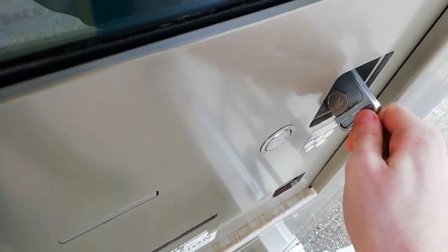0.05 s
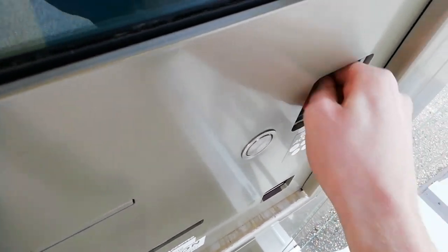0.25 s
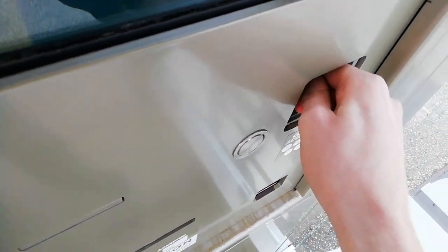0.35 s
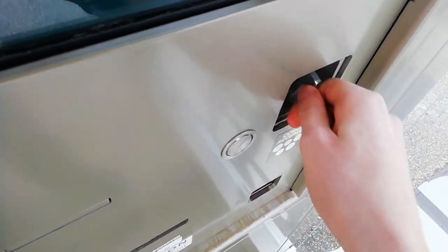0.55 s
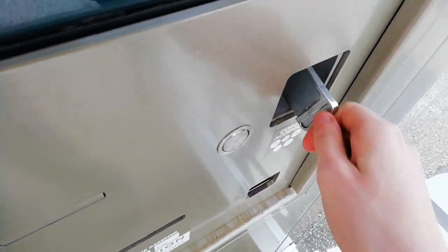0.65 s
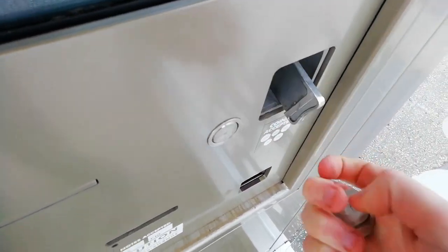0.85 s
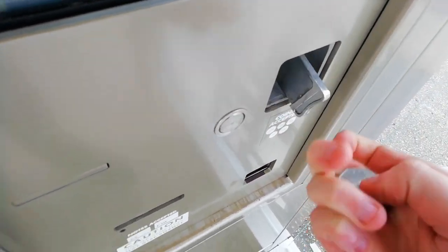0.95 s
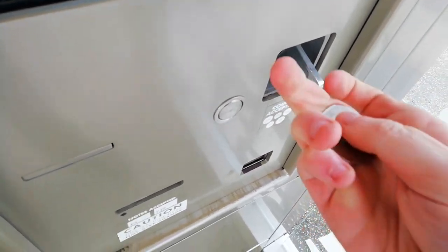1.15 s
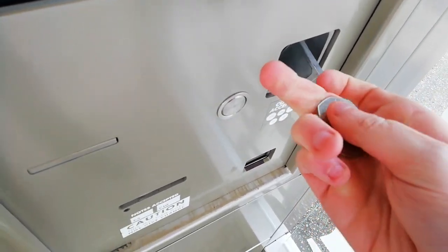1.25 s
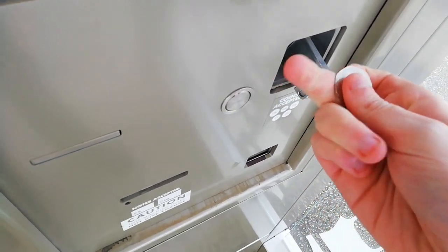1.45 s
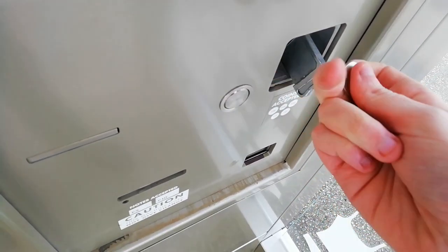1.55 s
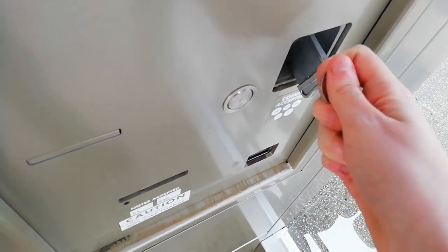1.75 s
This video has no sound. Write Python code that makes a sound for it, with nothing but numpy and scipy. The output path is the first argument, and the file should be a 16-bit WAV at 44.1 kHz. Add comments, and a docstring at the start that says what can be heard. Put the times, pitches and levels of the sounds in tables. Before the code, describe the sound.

A steel coin slide on a laundry machine is pushed in and springs back with sharp clanks and scrapes. The coin skitters down a chute, then coins click in a hand. It is close, with machines humming in the room.

```python
"""Laundry machine coin slide

A steel coin slide is pushed home and springs back, scraping in its guide and clanking against
the cabinet. The coin drops and skitters ringing down its chute; the next coins click in the hand.
The slot is close and louder on the left. Machines hum and rumble in the room."""
import sys
import numpy as np
from scipy.fft import rfft, irfft, next_fast_len
from scipy.io import wavfile
from scipy.ndimage import map_coordinates

SR = 44100
rng = np.random.default_rng(int(sys.argv[2]) if len(sys.argv) > 2 else 0)


def master(y):
    """Save y as 16-bit WAV."""
    cut = np.clip(np.atleast_2d(y).T, -1, 1)
    pcm = np.round(cut * 32767)  # scale
    wavfile.write(sys.argv[1], SR, pcm.astype(np.int16))


N = 79380
T = np.arange(N) / SR
ATTACK_S, TOP_HZ = 0.00011, 15900

# Blows of slide and coin (time [s], body [dB], clank [dB], edge [dB], sparkle [dB])
BLOWS = [(0.188, -37, -41, -43, -36.5), (0.2017, -34, -35, -33.5, -33), (0.2184, -29, -16, -25.5, -26),
         (0.2248, -31, -11, -14, -21), (0.2394, -24.5, -32, -44, -35), (0.2694, -32, -10.5, -21, -32.5),
         (0.2769, -23.5, -21.5, -35, -35), (0.3103, -15.5, -8, -16, -22), (0.3597, -37, -39, -30, -35),
         (0.396, -42, -25, -29.5, -21), (0.5104, -37, -36.5, -47, -45), (0.5521, -34, -30, -37, -35.5),
         (0.5855, -33, -24, -31, -41), (0.5922, -27, -22, -15, -30), (0.6015, -23.5, -24, -23, -21.5),
         (0.6077, -22, -18, -23.5, -19.5), (0.6833, -27.5, -24, -22.5, -15.5),
         (0.7175, -14.5, -13.5, -18, -14), (0.8142, -27, -21.5, -22.5, -18), (1.0045, -44, -52, -41.5, -34)]
# Steelwork decay, body to sparkle band (level [dB], t60 [s], late level [dB], late t60 [s])
BAND_DECAYS = [(-2, 0.079, -9.5, 0.24), (-2, 0.057, -17.5, 0.34), (0, 0.052, -14, 0.25),
               (0, 0.051, -24, 0.47)]
# Slide and front panel modes (frequency [Hz], level [dB], t60 [s])
PANEL_MODES = [(1066, -7.5, 0.22), (1373, -2.5, 0.17), (1682, -2, 0.093), (2146, -10, 0.13),
               (2238, 1.5, 0.094), (2353, -5.5, 0.08), (2850, -5.5, 0.11), (3300, -15, .13),
               (3525, -14, 0.1), (3497, -4, 0.06), (4540, -8, 0.072), (6470, -17, .15), (10130, -9, 0.099),
               (14770, -14, 0.089)]
CABINET_HZ, CABINET_DB, CABINET_T60_S = 265, -17, 0.35
MODES_DB, CRACK_DB, CRACK_T60_S = -7, 2, 0.0073
BAND_EDGES_HZ = [480, 2000, 4500, 9000, 17000]


def slide():
    """Each blow: a crack, a fast-dying clatter, and ringing panel and cabinet modes."""
    out, t = np.zeros((2, N)), T[:next_fast_len(SR // 4)]
    centres_hz = np.sqrt(np.multiply(BAND_EDGES_HZ[:-1], BAND_EDGES_HZ[1:]))
    modes = [(CABINET_HZ, CABINET_DB, CABINET_T60_S), *PANEL_MODES]
    waves, mode_hz = tones(modes, t), [mode[0] for mode in modes]
    crack = amp(CRACK_DB) * decay(t, CRACK_T60_S)
    envelopes = []
    for db, t60, late_db, late_t60 in BAND_DECAYS:
        late_ring = amp(late_db) * decay(t, late_t60)
        envelopes.append(amp(db) * np.sqrt(crack ** 2 + decay(t, t60) ** 2 + late_ring ** 2))
    for start_s, *band_db in BLOWS:
        drive_db = np.interp(mode_hz, centres_hz, band_db)
        add(out, start_s, strike(waves, drive_db + MODES_DB, scatter_db=2.5))
        for db, band, envelope in zip(band_db, clatter(len(t)), envelopes):
            add(out, start_s, amp(db) * band * envelope)
    return out


# Struck steel spectrum (frequency [Hz], level [dB])
STEEL_SPECTRUM = [(400, -27), (600, -14), (800, -22), (930, -2), (1400, -6.5), (1700, -2), (1880, -6),
                  (2200, -1), (2750, -7.5), (3400, -1.5), (3900, -10.5), (4800, -8), (5800, -8.5),
                  (7400, -11.5), (8800, -18), (10100, -2), (11000, -10.5), (13000, -5.5), (14900, -4),
                  (15900, -21)]
CONTACT_SCATTER_DB, CONTACT_STEP_HZ = 3, 150


def clatter(n):
    """Dense steel resonances, rms 1 per band; each contact point favours different ones."""
    hz = np.fft.rfftfreq(n, 1 / SR)
    knots = rng.standard_normal(512)
    contact_db = CONTACT_SCATTER_DB * np.interp(hz / CONTACT_STEP_HZ, np.arange(len(knots)), knots)
    spectrum = rfft(rng.standard_normal((2, n))) * amp(along(STEEL_SPECTRUM, hz) + contact_db)
    bands = [(hz > lo) & (hz <= hi) for lo, hi in zip(BAND_EDGES_HZ, BAND_EDGES_HZ[1:])]
    return [unit(irfft(spectrum * band, n)) for band in bands]


# Slide strokes (time [s], length [s], level [dB])
STROKES = [(0.406, 0.049, -29), (0.441, 0.076, -40.5), (0.52, 0.029, -34.5), (0.544, 0.04, -41),
           (0.634, 0.06, -28.5), (0.715, 0.006, -16), (0.75, 0.061, -47.5)]
# Steel-on-steel friction spectrum (frequency [Hz], level [dB])
SCRAPE_SPECTRUM = [(900, -20), (1400, 2), (2300, -3.5), (3200, 2), (4200, -6.5), (7000, -10), (9000, -16),
                   (11000, -14.5), (15000, -14)]


def scrapes():
    """The slide rubs in its guide in short, gritty strokes."""
    envelope = sum(amp(db) * np.sin(np.pi * np.clip((T - start_s) / length_s, 0, 1))
                   for start_s, length_s, db in STROKES)
    grit = unit(amp(wobble(600)))
    return envelope * grit * noise(SCRAPE_SPECTRUM, 1200, 15000, coherence=0.054)


# Skitter envelope (time [s], level [dB])
SKITTER_LEVEL = [(0.82, -23.5), (0.87, -30), (0.93, -31), (0.99, -39.5), (1.05, -43.5), (1.1, -51.5),
                 (1.3, -54.5)]
# Skitter spectrum (frequency [Hz], level [dB])
SKITTER_SPECTRUM = [(880, -42), (1500, 4), (1830, 0.5), (2720, -9.5), (3410, -4.5), (4000, -8.5),
                    (4870, -3.5), (9470, -14), (10600, -6.5), (12200, -8.5), (12600, -3.5), (13900, -9),
                    (15100, -2.5), (16000, -4.5)]
# Loose coin modes (frequency [Hz], level [dB], t60 [s])
LOOSE_COIN_MODES = [(3340, -12, 0.26), (4720, -18, .5), (12600, 2, 0.23), (12500, -2, .3), (12700, -5, .3),
                    (15170, -5, .25), (15350, 3, .25)]
# Hits on the loose coin (time [s], level [dB])
COIN_HITS = [(0.225, -46), (0.396, -41), (0.814, -28), (0.921, -32.5)]
SPIN_DB, SPIN_RATE_HZ = 0.5, 55


def chute():
    """The struck coin rings, flickering as it turns, and skitters down; the chute walls ring on."""
    gate = np.clip((T - 0.816) / 0.0055, 0, 1) * np.clip((1.45 - T) / 0.04, 0, 1)
    skitter = level(SKITTER_LEVEL) * noise(SKITTER_SPECTRUM, 1870, 22600, coherence=0.081)
    contacts = unit(amp(1.3 * wobble(60.3) + wobble(570)))
    out = gate * skitter * contacts
    ring, waves = np.zeros((2, N)), tones(LOOSE_COIN_MODES, T[:SR // 2])
    for start_s, db in COIN_HITS:
        add(ring, start_s, strike(waves, db, scatter_db=1.5))
    add(out, 0.814, cluster(hz=4791, db=-45.5, t60_s=2.2, rel_width=0.11))  # walls
    return out + ring * amp(SPIN_DB * wobble(SPIN_RATE_HZ))


# Coin contacts in the hand (time [s], level [dB])
HAND_CLINKS = [(0.0129, -31.5), (1.3248, -37.5), (1.359, -21.5), (1.3631, -25.5), (1.403, -39.5),
               (1.493, -40.5)]
# Finger-damped coin modes (frequency [Hz], level [dB], t60 [s])
HELD_COIN_MODES = [(3400, -12, 0.022), (4180, 7.5, 0.011), (4770, -6, 0.059), (5770, -5, 0.077),
                   (6140, 2.5, 0.011), (10020, -2.5, 0.025), (14100, -11, .03)]
# Contact tick spectrum (frequency [Hz], level [dB])
TICK_SPECTRUM = [(2000, -16), (3600, -5), (4700, 4.5), (6200, -3), (7800, -14.5), (9000, -31), (10200, -7),
                 (12000, -13.5), (15500, -8)]
CLINK_DB, TICK_DB, TICK_T60_S = -4.5, -3, 0.038
SETTLE_DB, SETTLE_T60_S = -44, 0.4


def coins():
    """One coin settles ringing in the slide; others tick together between the fingers."""
    out, ticks, t = np.zeros((2, N)), np.zeros(N), T[:SR // 4]
    waves = tones(HELD_COIN_MODES, t)
    for start_s, db in HAND_CLINKS:
        add(ticks, start_s, amp(db + TICK_DB) * decay(t, TICK_T60_S))
        add(out, start_s, strike(waves, db + CLINK_DB, scatter_db=1.5))
    add(out, 0, cluster(hz=5127, db=SETTLE_DB, t60_s=SETTLE_T60_S, rel_width=0.022))
    add(ticks, 0, amp(SETTLE_DB + TICK_DB) * decay(t, SETTLE_T60_S))
    add(out, 1.505, cluster(hz=3050, db=-29.5, t60_s=0.02, rel_width=0.072))  # finger tap
    return out + ticks * noise(TICK_SPECTRUM, 2400, 18000, coherence=0.059)


# Machine rumble spectrum (frequency [Hz], level [dB])
RUMBLE_SPECTRUM = [(12, -41), (20, -10.5), (107, -6.5), (134, -7), (177, -9), (211, -6.5), (261, -14),
                   (336, -24.5), (400, -46), (520, -57), (880, -120)]
# Rumble envelope (time [s], level [dB])
RUMBLE_ENVELOPE = [(0.0, -38.5), (0.114, -39), (0.436, -49), (0.53, -39.5), (0.856, -41.5), (0.992, -36),
                   (1.056, -42), (1.428, -41), (1.458, -39.5), (1.8, -40)]
# Motor hum envelope (time [s], level [dB])
HUM_LEVEL = [(0, -69), (.8, -57), (1.0, -39), (1.12, -56.5), (1.38, -43), (1.48, -36.5), (1.6, -47.5),
             (1.8, -57)]
HUM_HZ, OVERTONE_HZ = 100.85, 208


def machines():
    """Running machines: low rumble, a swelling motor hum and a faint overtone."""
    rumble = amp(0.5) * level(RUMBLE_ENVELOPE) * noise(RUMBLE_SPECTRUM, 15, 390, coherence=0.985)
    hum = level(HUM_LEVEL) * np.sqrt(2) * drifting_sine(HUM_HZ, drift_hz=2.52, rate_hz=6)
    overtone = amp(-53.5) * drifting_sine(OVERTONE_HZ, drift_hz=3, rate_hz=8.9)
    return rumble + hum + overtone


# Room wash, common to both channels (frequency [Hz], level [dB])
MID_SPECTRUM = [(180, -18), (300, -11), (329, -11), (465, -10.5), (572, -5.5), (664, -10), (929, 0.5),
                (1210, -5.5), (1440, -2.5), (1570, -8), (1740, -9.5), (2000, -10.5), (2240, -30.5),
                (2800, -39), (3640, -61), (6160, -120)]
# Room wash, in antiphase (frequency [Hz], level [dB])
SIDE_SPECTRUM = [(120, -43), (200, -14), (301, -27.5), (401, -13), (534, -17), (610, -4), (831, -2.5),
                 (938, -6), (1120, -9.5), (1220, -17), (1380, -8.5), (1880, -20.5), (2800, -28),
                 (3640, -58), (6160, -120)]
# Room wash envelope (time [s], level [dB])
WASH_ENVELOPE = [(0, -40.5), (.2, -42), (.35, -46.5), (.55, -40), (1.0, -41), (1.25, -38.5), (1.8, -40)]
# Hiss spectrum (frequency [Hz], level [dB])
HISS_SPECTRUM = [(2000, 8.5), (3000, 0), (4500, -11.5), (8000, -16.5), (14000, -19), (16000, -14)]


def room():
    """Machine noise fills the room with a wide midrange wash and faint hiss."""
    mid = noise(MID_SPECTRUM, 273, 2800, coherence=1)
    side = amp(1.5) * noise(SIDE_SPECTRUM, 170, 2500, coherence=1) * [[1], [-1]]
    hiss = amp(-51) * noise(HISS_SPECTRUM, 2040, 19000, coherence=0.067) * amp([[1.5], [-1.5]])
    return level(WASH_ENVELOPE) * (mid + side) + hiss


def tones(modes, t):
    """One decaying complex tone per mode."""
    hz, db, t60_s = np.transpose(modes)[:, :, None]
    return amp(db) * np.exp(2j * np.pi * hz * t) * decay(t, t60_s)


def strike(waves, db, scatter_db):
    """Sum the modes with random level and phase per channel."""
    shape = (2, len(waves))
    gain = amp(db + scatter_db * rng.standard_normal(shape))
    phasor = np.exp(2j * np.pi * rng.random(shape))
    return np.einsum("cm,mt->ct", gain * phasor, waves).real


def cluster(hz, db, t60_s, rel_width):
    """Many close modes around one pitch, dying together."""
    n = next_fast_len(SR * 3 // 4)
    band = np.exp(-0.5 * ((np.fft.rfftfreq(n, 1 / SR) / hz - 1) / rel_width) ** 2)
    ring = unit(irfft(rfft(rng.standard_normal((2, n))) * band, n))
    return amp(db) * ring * decay(T[:n], t60_s)


def noise(spectrum, lo_hz, hi_hz, coherence):
    """Coloured stereo noise, rms 1, with soft band edges."""
    def response(hz):
        rolloff = np.sqrt((1 + (lo_hz / (hz + 1)) ** 12) * (1 + (hz / hi_hz) ** 12))
        return amp(along(spectrum, hz)) / rolloff

    white = rng.standard_normal((3, N))
    pair = np.sqrt(coherence) * white[0] + np.sqrt(1 - coherence) * white[1:]
    return unit(filtered(pair, response))


def drifting_sine(hz, drift_hz, rate_hz):
    """Sine with a wandering pitch."""
    return np.sin(2 * np.pi * np.cumsum(hz + drift_hz * wobble(rate_hz)) / SR)


def wobble(rate_hz):
    """Smooth random curve, rate_hz knots per second."""
    return map_coordinates(rng.standard_normal(2048), [T * rate_hz], mode="wrap")


def decay(t, t60_s):
    """Quick attack, exponential fall."""
    return amp(-60 * t / t60_s) * (1 - np.exp(-t / ATTACK_S))


def filtered(x, response):
    """Zero-phase filter with gain response(hz)."""
    n = next_fast_len(N + 8192)
    return irfft(rfft(x, n) * response(np.fft.rfftfreq(n, 1 / SR)), n)[..., :N]


def along(points, hz):
    """Interpolate (Hz, dB) points on a log frequency axis."""
    knots_hz, db = np.transpose(points)
    return np.interp(np.log(hz + 1), np.log(knots_hz + 1), db)


def level(points):
    """Gain per sample from (s, dB) points."""
    return amp(np.interp(T, *np.transpose(points)))


def amp(db):
    """Decibels to gain."""
    return 10 ** (np.asarray(db) / 20)


def unit(x):
    """Scale to rms 1."""
    return x / np.sqrt(np.mean(x ** 2) + 1e-20)


def add(out, start_s, x):
    """Mix x into out from start_s."""
    i = round(start_s * SR)
    out[..., i:i + x.shape[-1]] += x[..., :N - i]


# Stereo balance of the slot (frequency [Hz], left over right [dB])
SLOT_BALANCE = [(500, 9.5), (1300, 10), (3000, 4.5), (5000, 3), (7500, -6), (10000, 9), (15000, 17.5)]


def slot_pan(hz):
    """Constant-power channel gains; the microphone's left port faces the slot."""
    lead_db = along(SLOT_BALANCE, hz)
    gains = amp(np.array([lead_db, -lead_db]) / 2)
    return gains / np.sqrt(np.mean(gains ** 2, axis=0))


def scene():
    """The slot, louder on the left, over the machines and room."""
    metal = slide() + scrapes() + chute() + coins()
    return filtered(metal, slot_pan) + machines() + room()


def record(dry):
    """Clip at full scale; cut above TOP_HZ."""
    return filtered(np.clip(dry, -1, 1), lambda hz: hz < TOP_HZ)


dry = scene()
out = record(dry)
master(out)
```